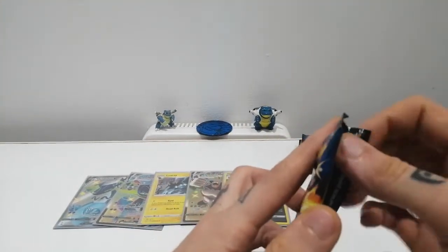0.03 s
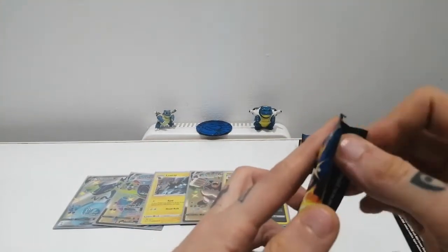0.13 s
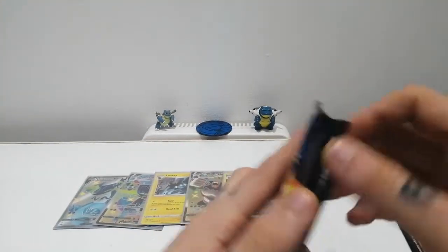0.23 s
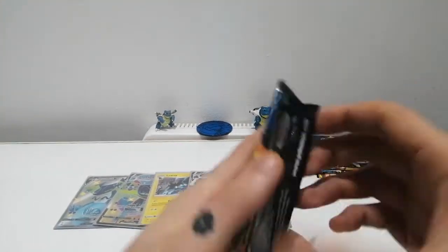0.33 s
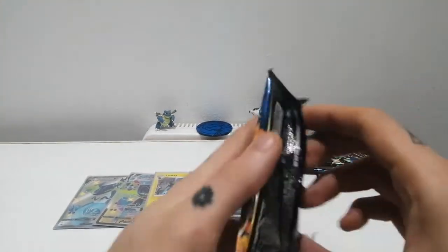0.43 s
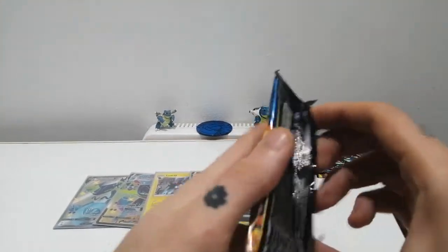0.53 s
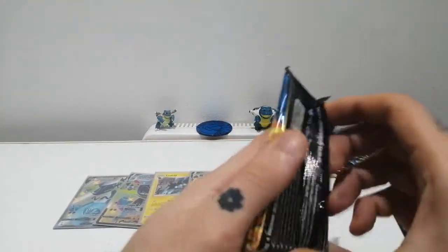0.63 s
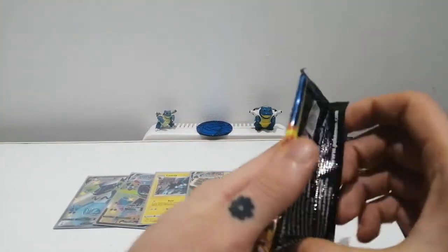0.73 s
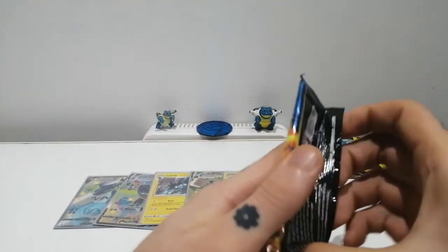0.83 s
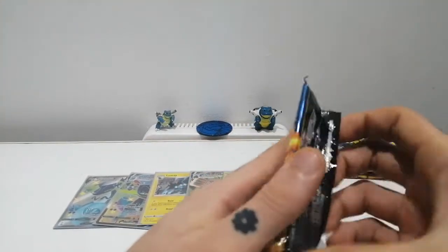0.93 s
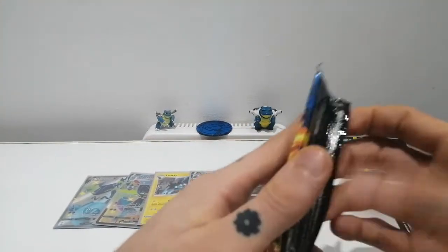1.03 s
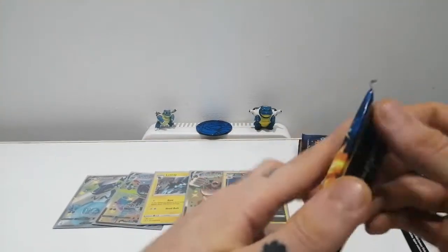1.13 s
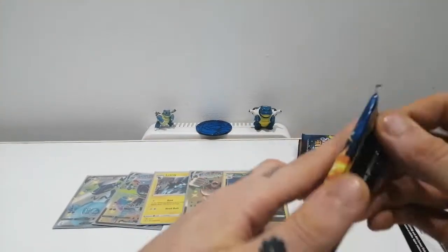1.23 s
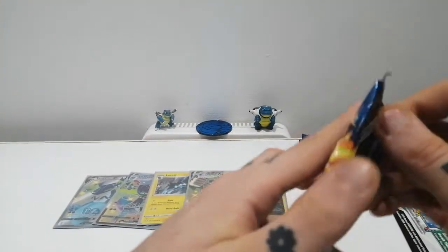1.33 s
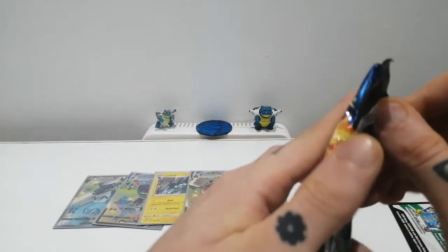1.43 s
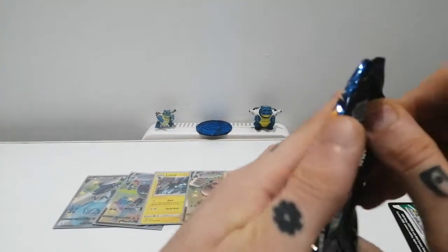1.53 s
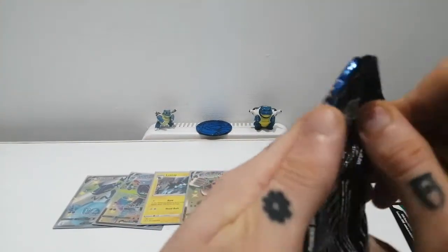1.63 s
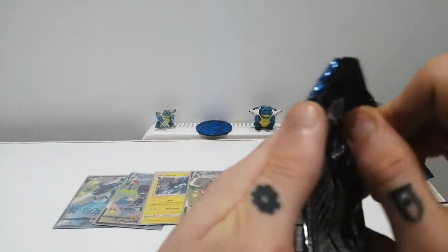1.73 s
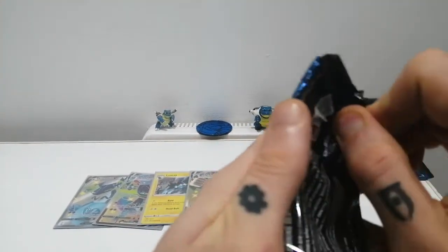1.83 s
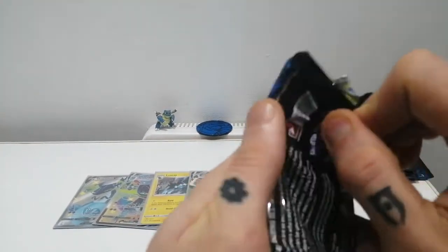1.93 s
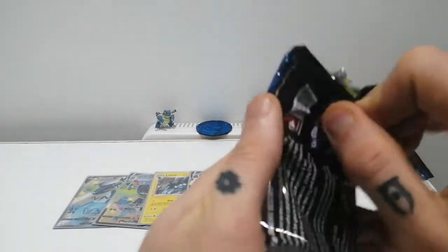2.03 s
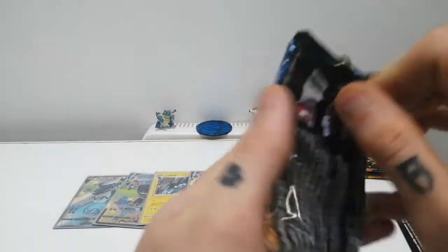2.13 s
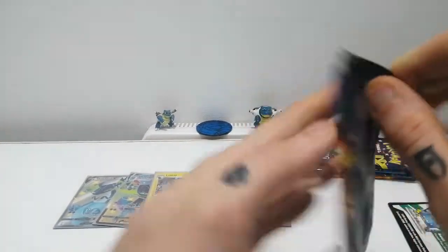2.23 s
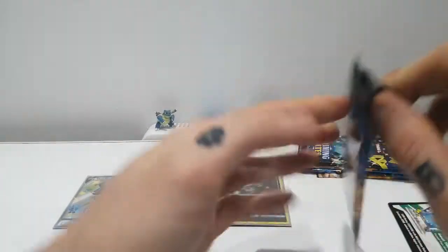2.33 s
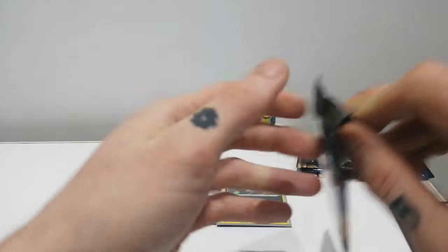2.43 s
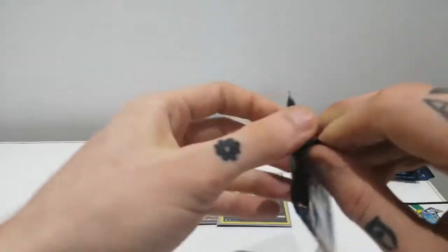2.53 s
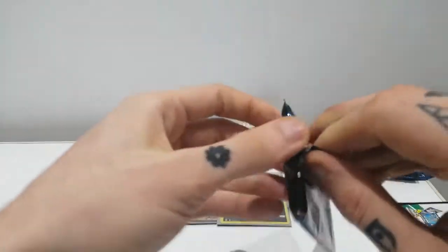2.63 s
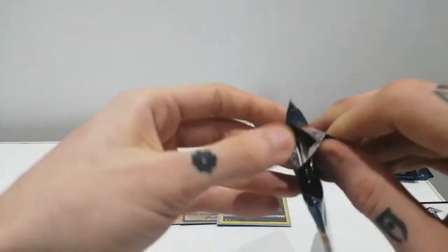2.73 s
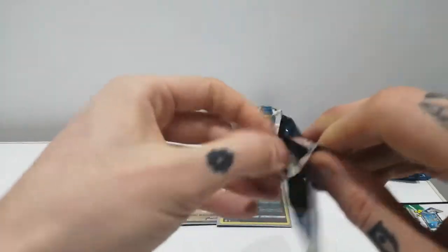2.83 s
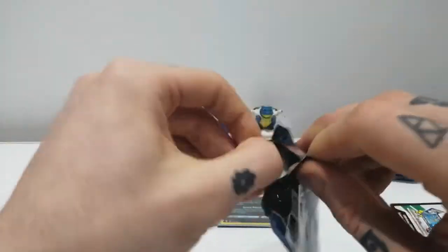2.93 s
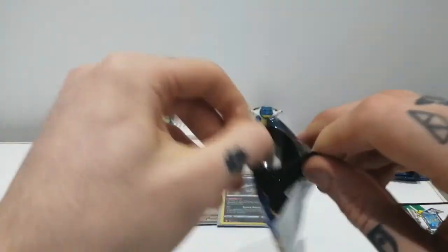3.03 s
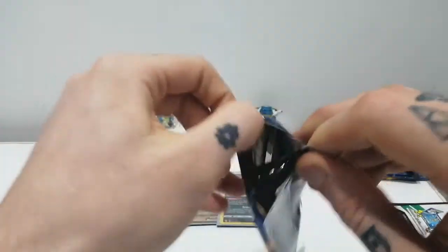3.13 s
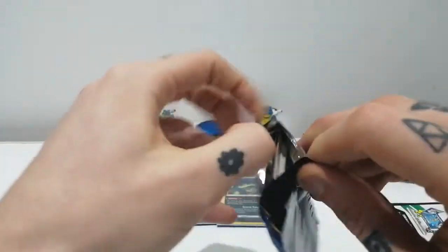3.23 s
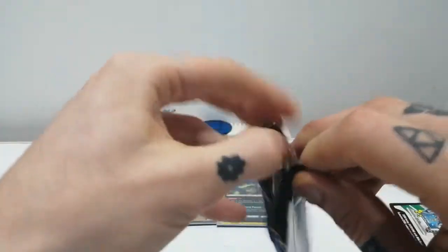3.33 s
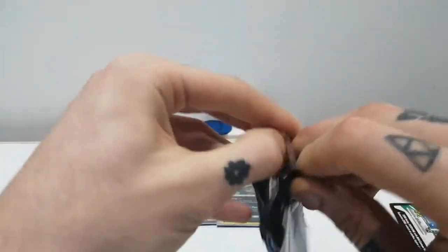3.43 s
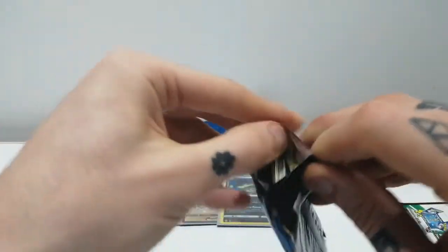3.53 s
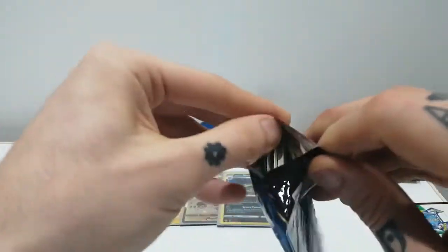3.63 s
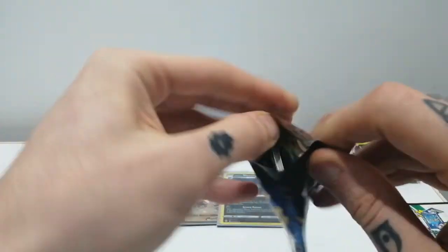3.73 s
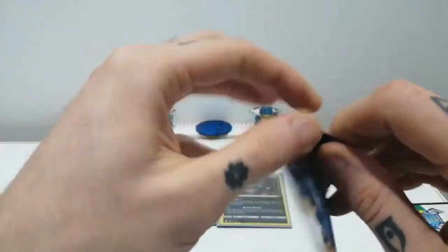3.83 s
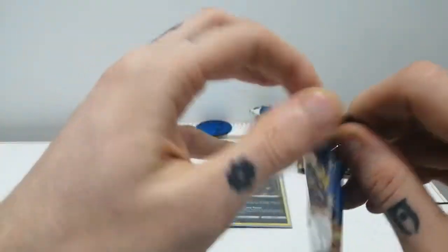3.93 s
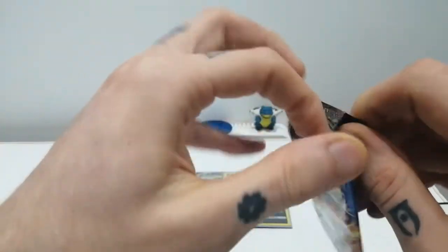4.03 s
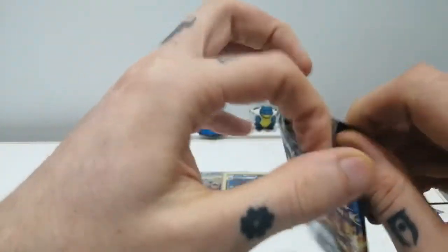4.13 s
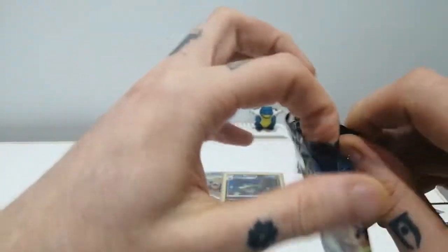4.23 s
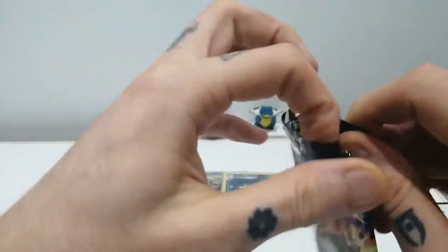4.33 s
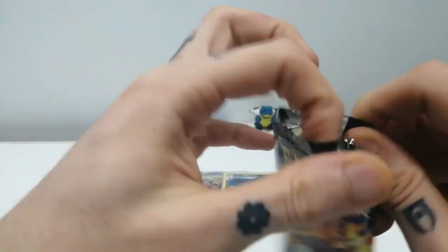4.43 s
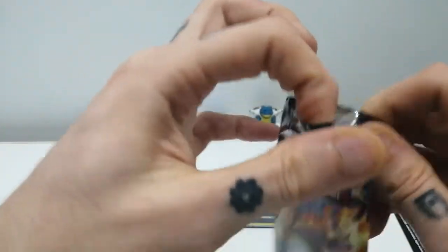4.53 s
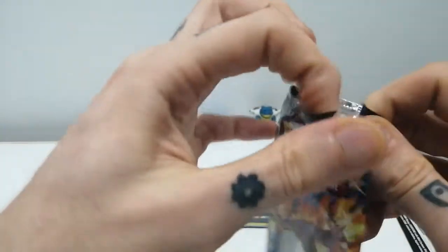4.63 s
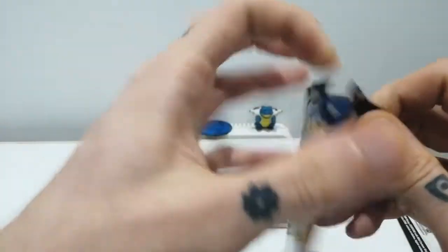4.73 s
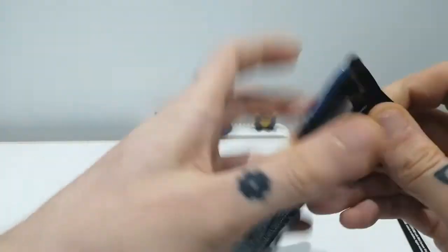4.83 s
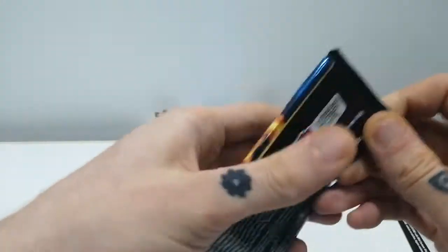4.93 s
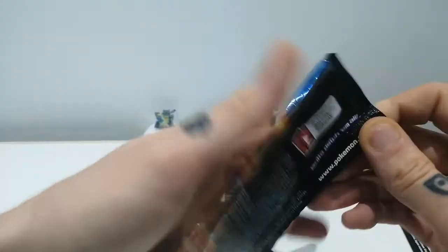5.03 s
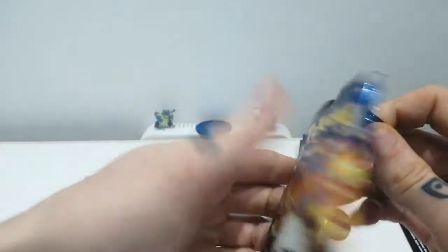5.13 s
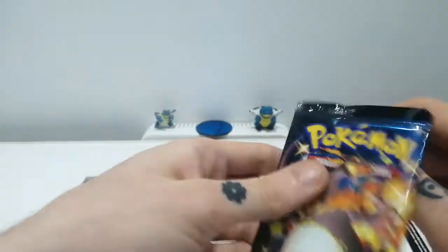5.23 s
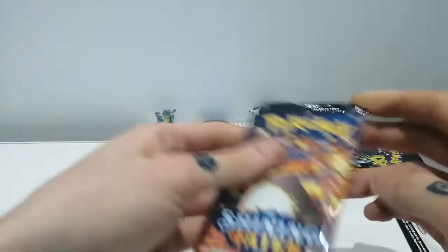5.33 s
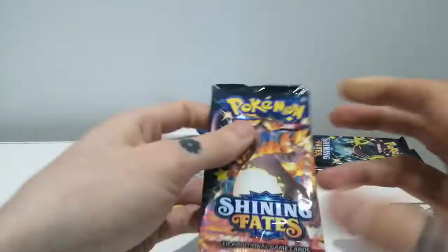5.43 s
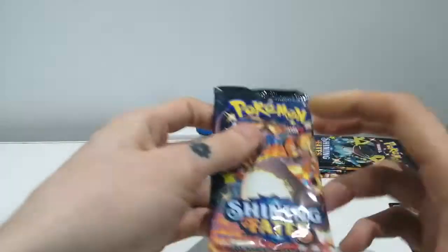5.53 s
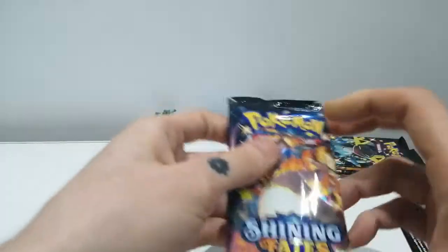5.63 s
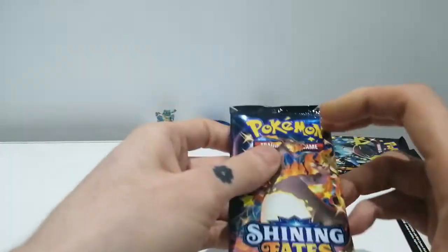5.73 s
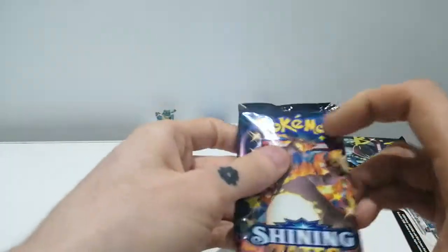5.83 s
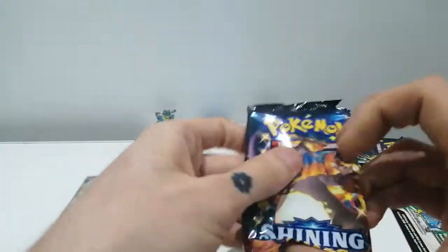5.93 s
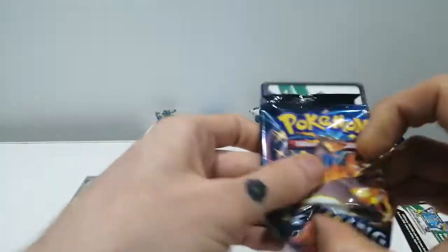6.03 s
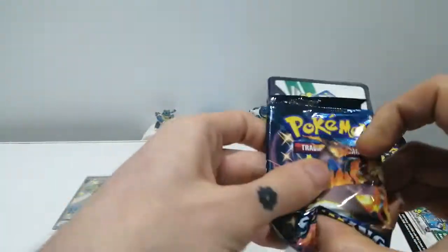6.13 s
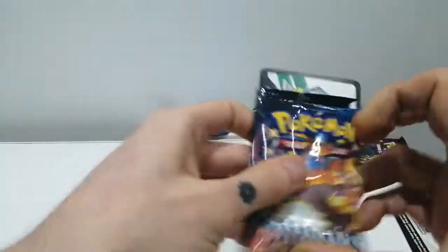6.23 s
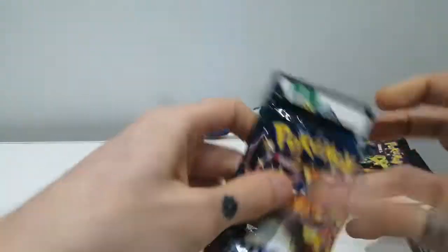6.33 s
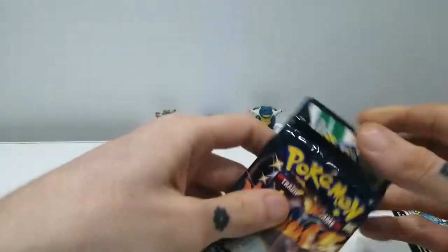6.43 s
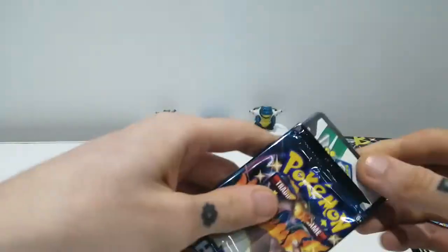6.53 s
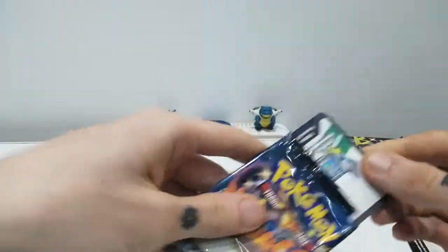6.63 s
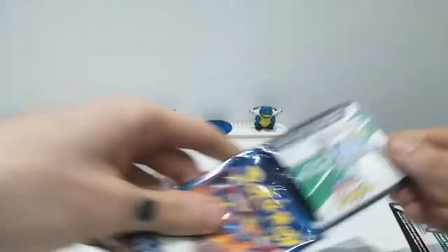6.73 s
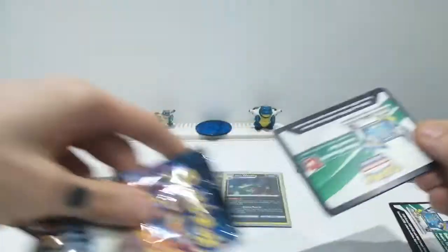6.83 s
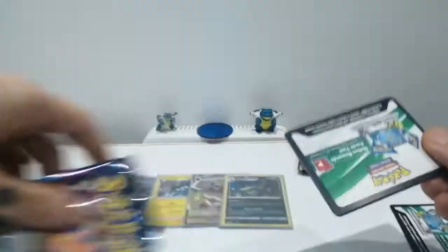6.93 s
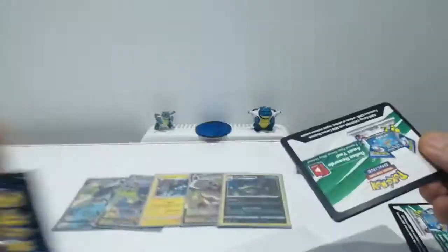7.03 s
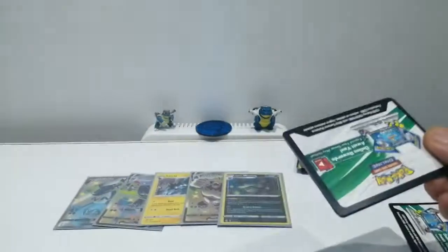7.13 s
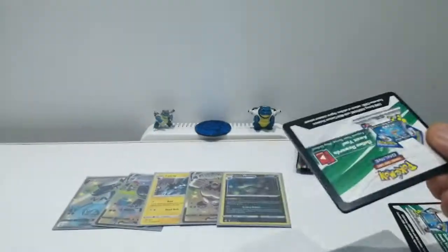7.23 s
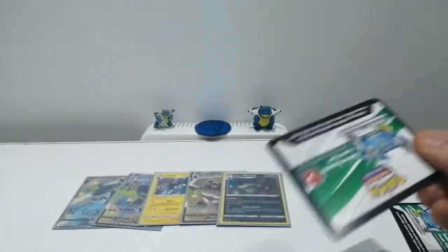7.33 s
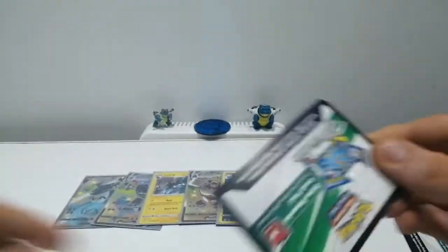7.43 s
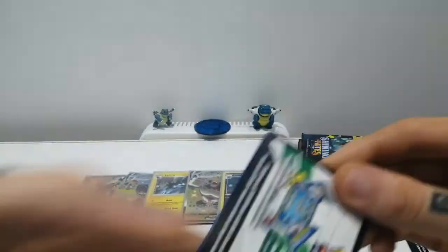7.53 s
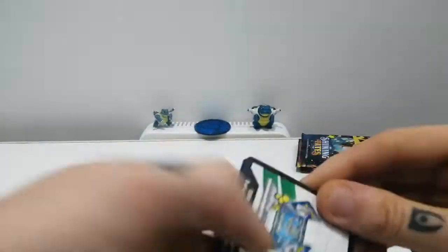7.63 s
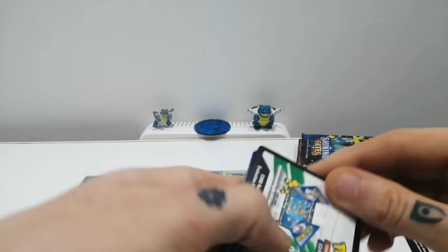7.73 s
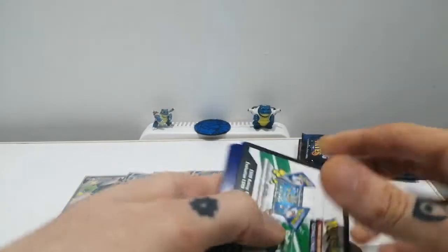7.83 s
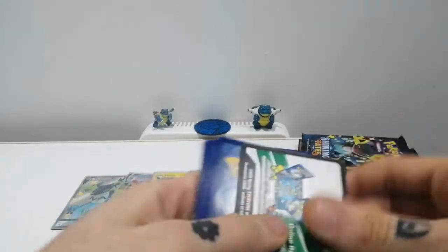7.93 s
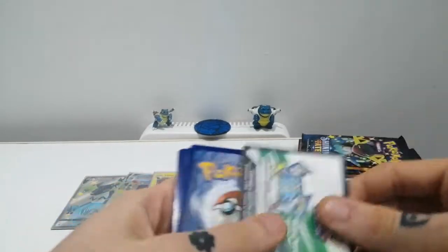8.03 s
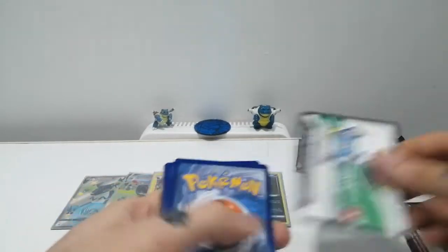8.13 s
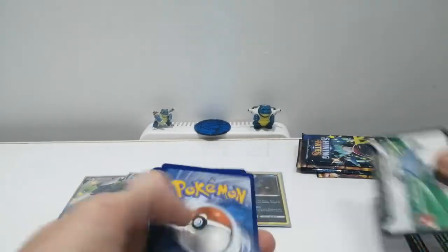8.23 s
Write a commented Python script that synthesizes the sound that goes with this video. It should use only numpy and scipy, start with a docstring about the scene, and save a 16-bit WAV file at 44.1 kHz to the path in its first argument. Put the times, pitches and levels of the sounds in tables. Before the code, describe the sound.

Hands crinkle and tear a crisp foil card pack close to the microphone, then slide cards out with soft hissing rubs and light table bumps.

```python
"""A table in a small room, a two-port microphone close by: hands crinkle a foil card pack and tear it open.
Creases snap and ring their facets over a crackle of tiny flicks; faces of the pouch pop as damped low tones.
Cards slide as a hiss that catches and slips, blows ring the table's modes, and walls return the foil's sound.
A low sine hum wavers underneath, over the faint coloured noise of the room."""
import sys
import numpy as np
from scipy import signal
from scipy.fft import rfft, irfft
from scipy.io import wavfile
from scipy.ndimage import uniform_filter1d

SR = 44100
rng = np.random.default_rng(int(sys.argv[2]) if len(sys.argv) > 2 else 0)


def transcribe(u):
    """Save the signal u as a 16-bit wav file named by the first command-line argument.

    u: samples, shape (n,) or (channels, n), limited to [-1, 1]; the rate is SR.
    q: integer samples, one column per channel.
    """
    v = np.clip(np.atleast_2d(u).T, -1, 1)
    q = np.round(v * 32767).astype(np.int16)
    wavfile.write(sys.argv[1], SR, q)


N = 364707  # samples

# colour of the foil, with the microphone's peak near 15 kHz on top: f/Hz, level per Hz/dB
FOIL_COLOUR = [(60, -42), (150, -25), (330, -17.5), (600, -18.5), (790, -9), (1500, -13), (2100, -8.5),
               (3150, -3), (3800, -9), (5200, 0.5), (7200, 0), (9300, -7.5), (13500, -13), (15000, -8),
               (16000, -30.5)]


def amp(db):
    """Decibels to gain."""
    return 10 ** (np.asarray(db) / 20)


def unit(x):
    """Scales to rms 1."""
    return x / np.sqrt(np.mean(x ** 2) + 1e-20)


def read(points, hz):
    """Reads a spectrum table on a log-frequency axis."""
    f, value = np.transpose(points)
    return np.interp(np.log(hz + 1), np.log(f + 1), value)


def follow(rows):
    """The columns of a curve over time, at every sample."""
    s, *columns = np.transpose(rows)
    return [np.interp(np.arange(N) / SR, s, column) for column in columns]


def bins(size):
    """Frequencies of a real FFT, in Hz."""
    return np.fft.rfftfreq(size, 1 / SR)


def peak(hz, centre_hz, width_hz):
    """The bell of a resonance, 1 at its centre."""
    return 1 / (1 + ((hz - centre_hz) / width_hz) ** 2)


def causal(db):
    """Minimum-phase response with these gains: it rings only after the blow."""
    log_gain = np.log(amp(db))
    circle = np.concatenate([log_gain, log_gain[..., -2:0:-1]], -1)
    return np.exp(np.conj(signal.hilbert(circle)))[..., :log_gain.shape[-1]]


def colour(x, points, size=2048):
    """Filters two channels by a spectrum table."""
    response = irfft(causal(read(points, bins(size))))
    return signal.oaconvolve(x, response[None], axes=1)[:, :N]


def add(mix, s, sound):
    """Mixes a sound in at time s, in seconds."""
    part = mix[:, max(round(s * SR), 0):][:, :sound.shape[-1]]
    part += sound[..., :part.shape[1]]


def worked(rustle, treble, body, split_hz=3000):
    """Plays a rustle with one gain for its treble and one for its body."""
    low = signal.sosfiltfilt(signal.butter(2, split_hz, fs=SR, output="sos"), rustle)
    return treble * (rustle - low) + body * low


def background(hum_hz=101, low_hum_hz=54.4, low_hum_db=-94.5, air_db=-76.5):
    """A wavering low hum and a faint steady one below it, two sines over the noise of the quiet room."""
    # the wavering hum: t/s, rms level/dB
    hum_level = [(0, -76.5), (.24, -84), (.54, -70.5), (.97, -88.5), (1.26, -70.5), (1.55, -88.5),
                 (2.1, -75), (2.36, -94), (2.6, -75.5), (3.15, -84.5), (3.55, -76), (5.3, -83.5),
                 (5.64, -71), (5.97, -87), (6.3, -80.5), (7.45, -78), (7.8, -68), (8.25, -88)]
    # colour of the quiet room: f/Hz, level per Hz/dB
    air_colour = [(20, -16), (35, -8.5), (48, 0), (75, -14.5), (150, -16.5), (300, -18.5), (1000, -26),
                  (3000, -31), (4000, -33.5), (7000, -40), (10000, -38.5), (16000, -37)]
    t = np.arange(N) / SR
    hum = amp(follow(hum_level)[0]) * np.sin(2 * np.pi * hum_hz * t)
    hum += amp(low_hum_db) * np.sin(2 * np.pi * low_hum_hz * t)
    air = unit(colour(rng.standard_normal((2, N)), air_colour))
    return np.sqrt(2) * hum + amp(air_db) * air  # the root of 2 brings a sine to rms 1


def room(x, tail_db=-9, wall_db=-16, wall_s=.0105, wall_spread_s=0.00016):
    """A reflection from the near wall, and a tail of sparse echoes that dies band by band."""
    # decay of the room: f/Hz, t60/s
    decay_times = [(200, 0.88), (1000, 0.47), (3000, 0.61), (6000, 0.63), (10000, 0.33), (16000, 0.93)]
    t = np.arange(SR * 3 // 4) / SR
    taps = rng.standard_normal((2, len(t))) * (rng.random((2, len(t))) < .15)
    wall = taps * np.exp(-((t - wall_s) / wall_spread_s) ** 2)
    hz, at, z = signal.stft(taps * (t > .003), SR, nperseg=256)
    fading = z * amp(-60 * at / read(decay_times, hz)[:, None])
    tail = signal.istft(fading, SR, nperseg=256)[1][:, :len(t)]
    echo = amp(tail_db) * tail / np.linalg.norm(tail, axis=1, keepdims=True)
    echo += amp(wall_db) * wall / np.linalg.norm(wall, axis=1, keepdims=True)
    return signal.fftconvolve(x, echo, axes=1)[:, :N]


def shifting_echo(x, count=5, rounds_per_s=2.3):
    """The echo crossfades steadily round several random sets of reflections, so its colour keeps changing."""
    position = count * rounds_per_s * np.arange(N) / SR
    out = np.zeros((2, N))
    for k in range(count):
        away = abs((position - k) % count - count / 2)
        out += room(x * np.cos(np.pi / 2 * np.minimum(away, 1)))
    return out


def bumps(rattle_db=-15, rattle_s=0.14, rattle_hz=700, chatter_db=5, size=300):
    """Soft blows ring the table's damped modes and briefly rattle what lies on it, as low-passed noise."""
    # blows on the table: t/s, level/dB
    blows = [(6.904, -44), (6.933, -60), (6.974, -53), (7.061, -58.5), (7.1, -65), (7.172, -72),
             (7.301, -67)]
    # modes of the table: f/Hz, level within a blow/dB, t60/s
    modes = [(47.5, -1, 0.55), (59, 1.5, 0.19), (87.4, -5, 0.34), (136, -29, 0.2), (315, -10, 0.11),
             (550, -24, 0.068), (800, -9, 0.082), (897, -6.5, 0.075)]
    t, out = np.arange(SR // 2) / SR, np.zeros((2, N))
    ring = sum(amp(db - 60 * t / t60) * np.sin(2 * np.pi * hz * t) for hz, db, t60 in modes)
    dull = signal.butter(2, rattle_hz, fs=SR)
    for s, db in blows:
        # contact comes and goes
        chatter = amp(chatter_db * unit(uniform_filter1d(rng.standard_normal(len(t)), size)))
        rattle = unit(signal.lfilter(*dull, chatter * rng.standard_normal((2, len(t)))))
        add(out, s, amp(db) * (amp(rattle_db) * rattle * np.exp(-t / rattle_s) - ring))
    return out


def sliding(catch_db=3.0, size=130):
    """Card rubbing on foil or card: a hiss that catches and slips every few milliseconds."""
    # colour of a sliding card: f/Hz, level per Hz/dB
    card_colour = [(60, -18), (250, -13.5), (580, -16.5), (1000, -13.5), (2000, -19.5), (3100, -10.5),
                   (4000, -18.5), (5200, -3.5), (7250, -2.5), (9400, -11.5), (13000, -14.5), (15000, -12),
                   (16000, -23)]
    catch = amp(catch_db * unit(uniform_filter1d(rng.standard_normal(N), size)))
    return unit(colour(catch * rng.standard_normal((2, N)), card_colour))


def strokes(rows, rise_s, fall_s):
    """Power of the treble and of the body over time: each stroke of the fingers builds, holds and lets go."""
    t, power = np.arange(SR // 2) / SR, np.zeros((2, N))
    for start, length, db, body in rows:
        build = np.sin(np.pi / 2 * np.minimum(t / rise_s, 1)) ** 2
        push = build * np.exp(-np.maximum(t - length, 0) / fall_s)
        add(power, start, (amp([[db], [db + body]]) * push) ** 2)
    return power


def effort(grip_body_db=2):
    """How hard the foil is worked, as gains of treble and body: squeezes on top of the steady grip."""
    # squeezes and pulls, each a burst of crackle:
    # start t/s, length/s, treble gain/dB, body of the whole pack relative to the treble/dB
    squeezes = [(0, .06, -49, -29), (.275, .025, -45, -7), (.44, .13, -60.5, 4.5), (.616, .11, -52, -0.5),
                (.733, .04, -43.5, -1), (.94, .06, -55, 11), (1.003, .04, -47, 0), (1.05, .14, -57, -1.5),
                (1.668, .02, -50, 4.5), (1.765, .035, -49, 1), (1.795, .042, -39, -22),
                (1.936, .05, -42, -5), (2.165, .035, -57, 7), (2.205, .06, -51, 3), (2.275, .05, -60, 8),
                (2.335, .08, -54.5, -5), (2.69, .1, -51.5, -6), (2.958, .04, -50, 3),
                (3.035, .065, -42, 3.5), (3.11, .2, -54, 1), (3.43, .07, -57.5, 4), (3.6, .07, -54, 6),
                (3.795, .05, -53, -5), (3.89, .05, -56.5, 2), (4.05, .04, -62, 10.5), (4.1, .025, -50.5, 3),
                (4.19, .05, -51.5, -2), (4.275, .06, -62, 12), (4.46, .07, -49, 5), (4.555, .06, -55, -6),
                (4.69, .06, -55, 10), (4.895, .05, -52, 2), (5.01, .05, -53, 6.5), (5.2, .15, -62, 6.5),
                (5.668, .025, -70, 12), (5.864, .11, -54, -2.5), (6.02, .05, -52, -0.5),
                (6.06, .04, -48, 2.5), (6.105, .025, -45, -20), (6.245, .03, -56, 14),
                (6.275, .04, -46.5, 6), (6.53, .012, -53, -15)]
    # the pack merely held: t/s, treble gain/dB
    held = [(0, -57), (1.1, -60), (1.25, -66), (1.7, -60), (2.1, -64), (2.55, -64), (2.8, -59), (3.7, -63),
            (4.1, -60), (4.4, -66), (5.37, -67), (5.45, -83), (5.85, -84), (5.9, -61), (6.42, -62),
            (6.6, -74), (7.0, -88), (7.5, -100)]
    grip = amp(follow(held)[0] + np.array([[0], [grip_body_db]]))
    return np.sqrt(strokes(squeezes, rise_s=0.0073, fall_s=.014) + grip ** 2)


def body_share(hz, full_hz=1900, none_hz=4600):
    """The pack as a whole radiates the low range, single facets the high."""
    return read([(full_hz, 1), (none_hz, 0)], hz)


def flicks(count, decay_s, scatter, build_up_s=0.0003107, likeness=0.58, lag_s=.00005, size=1024):
    """Spectra of clicks at both ports: a sharp impulse amid bending waves scattered by the creases."""
    t = np.arange(size) / SR
    paths = rng.standard_normal((count, 3, size))
    waves = paths[:, :2] + likeness * paths[:, 2:]  # the third path is common to both ports
    waves *= np.exp(-t / decay_s) * (1 - np.exp(-t / build_up_s))
    waves *= scatter / np.linalg.norm(waves, axis=-1, keepdims=True)
    # the sound reaches the left port first
    lag = lag_s * (.5 + rng.random((count, 1, 1))) * np.array([[0], [1]])
    delay = -2j * np.pi * bins(size)
    return (rfft(waves) + np.exp(delay * build_up_s)) * np.exp(delay * lag)


def crackle(per_s=1100, firm_db=-50, quickening=.7, spread_db=5.5, ring_db=6, ring_width_hz=600,
            count=90, size=1024):
    """Tiny creases and the tearing seam: a train of flicks from many facets, a few of them large."""
    hz, out = bins(size), np.zeros((2, N))
    # sparse ticks when held, a dense rip when pulled
    rate = per_s * (effort()[0] / amp(firm_db)) ** quickening
    sizes = amp(spread_db * np.minimum(rng.exponential(1, N), 4))
    sizes *= rng.random(N) < rate / SR
    # the work done is shared among the creases
    sizes /= np.sqrt(abs(uniform_filter1d(sizes ** 2, size=2000)) + 1e-4)
    facet = rng.integers(0, count, N)
    shape = ring_db * peak(hz, rng.uniform(3200, 9000, (count, 1)), ring_width_hz)
    shape += 3.9 * rng.standard_normal((count, 1)) * body_share(hz)  # dB
    ticks = irfft(flicks(count, decay_s=0.0018, scatter=2.4) * causal(shape)[:, None])
    for at in np.flatnonzero(sizes):
        add(out, at / SR, sizes[at] * ticks[facet[at]])
    return unit(out)


def handling(crackle_db=-1, dull_hz=9000, dull_db=-3):
    """Crackle, its top dulled, follows the work of the fingers; the hiss of card follows each slide."""
    # cards and the empty pouch sliding:
    # start t/s, length/s, treble gain/dB, body relative to the treble/dB
    slides = [(6.65, 0.099, -54.5, 3), (6.78, 0.029, -50, 7.5), (6.89, 0.061, -61.5, 17),
              (7.03, 0.062, -74.5, 23.5), (7.15, 0.26, -78.5, 20), (7.31, 0.092, -75, 21.5),
              (7.46, 0.023, -72, -3), (7.5, 0.024, -73, 2), (7.82, 0.028, -76, -9), (7.9, .04, -76, -10),
              (7.935, 0.069, -66, -4), (8.05, 0.027, -65, 8.5), (8.085, .03, -63.5, 9.5),
              (8.115, 0.032, -55, -2)]
    fine = worked(unit(colour(crackle(), FOIL_COLOUR)), amp(dull_db), 1, dull_hz)
    foil = worked(fine, *effort())
    slide_gains = np.sqrt(strokes(slides, rise_s=0.011, fall_s=0.026))
    cards = worked(sliding(), *slide_gains)
    return amp(crackle_db) * foil + cards


def flexes(level_db=-2.0, decay_s=0.004, rise_s=0.00064, overtone=1.95, overtone_db=-6, side_db=-7):
    """A whole face of the pouch flips over with a dull pop: a few low cycles, damped by the fingers."""
    # flips between the fingers: t/s, level before level_db/dB, pitch f/Hz
    flips = [(0.287, -49, 424), (.958, -46.5, 438), (1.677, -55, 323), (2.243, -55.5, 422),
             (2.385, -55, 423), (3.386, -55, 422), (3.833, -55.5, 431), (4.008, -51.5, 342),
             (4.263, -51, 356), (4.524, -50.5, 430), (4.922, -52, 320), (5.012, -51, 442), (5.14, -56, 320),
             (6.343, -53.5, 438), (6.739, -57, 417), (6.786, -57.5, 276), (7.266, -56, 262)]
    t, out = np.arange(SR // 10) / SR, np.zeros((2, N))
    fade = np.exp(-t / decay_s) * (1 - np.exp(-t / rise_s))
    fade /= fade.max()
    for (s, db, hz), (detune, side) in zip(flips, rng.standard_normal((len(flips), 2))):
        phase = 2 * np.pi * hz * t
        pop = np.sin(phase) + amp(overtone_db) * np.sin(phase * (overtone + 0.21 * detune))
        ports = 1 + amp(side_db) * side * np.array([[1], [-1]])
        add(out, s, amp(db + level_db) * pop * fade * ports)
    return out


def small_snaps(count=80, crowding=.6, above_db=6, ceiling_db=-44, spread_db=2,
                body_spread_db=6, edge_db=2, edge_spread_db=5):
    """Further creases give way at random, oftener and louder the harder the foil is worked; rows for snaps()."""
    hard = effort()[0]
    work = np.cumsum(hard ** crowding)
    when, facet, size, body, edge = np.transpose(rng.random((count, 5)))
    at = np.searchsorted(work / work[-1], (np.arange(count) + when) / count)
    db = np.minimum(20 * np.log10(hard[at]) + above_db, ceiling_db) + spread_db * (2 * size - 1)
    ring_hz = 5400 + 1700 * facet
    body_level = body_spread_db * (2 * body - 1)
    edge_level = edge_db + edge_spread_db * (2 * edge - 1)
    return np.transpose([at / SR, db, ring_hz, body_level, edge_level])


def first_slips(rows, lead_s=.0028, weaker_db=-15, above_grip_db=4):
    """A crease under pressure slips a little just before it snaps through; rows for snaps()."""
    s, db, *tone = np.transpose(rows)
    pressure_db = 20 * np.log10(effort()[0][(s * SR).astype(int)])
    slip_s = s - lead_s * (.5 + rng.random(len(rows)))
    slip_db = np.minimum(db + weaker_db, pressure_db + above_grip_db)
    return np.transpose([slip_s, slip_db, *tone])


def ring_rms(spectra, hz):
    """Rms that short sounds have in the foil's ringing band, 4 to 9 kHz, over 4 ms."""
    band = (hz > 4000) & (hz < 9000)
    power = (abs(spectra) ** 2 * band).mean((-2, -1), keepdims=True)
    return np.sqrt(power / (.004 * SR))


def snaps(rows, body_db=-2.0, edge_db=-1.0, ring_db=6, ring_width_hz=520, panel_db=6, panel_width=0.033,
          pan_spread_db=5, size=1024):
    """Each crease pops through and rings its own facet for a few cycles, with the wider panel around it."""
    s, db, ring_hz, body, edge = np.transpose(rows)[..., None]
    hz, out = bins(size), np.zeros((2, N))
    panel_hz = 600 * 4 ** rng.random((len(rows), 1))
    shape = read(FOIL_COLOUR, hz) + (body + body_db) * body_share(hz)
    shape += (edge + edge_db) * read([(7500, 0), (10000, 1)], hz)
    shape += ring_db * peak(hz, ring_hz, ring_width_hz)
    shape += panel_db * peak(hz, panel_hz, panel_width * panel_hz)
    # a random level difference between the ports for each snap
    pan = pan_spread_db * rng.standard_normal((len(rows), 1))
    ports = amp(pan * np.array([.5, -.5]))[..., None]
    spectra = flicks(len(rows), decay_s=0.002, scatter=1.54) * causal(shape)[:, None] * ports
    pops = irfft(spectra / ring_rms(spectra, hz)) * amp(db)[..., None]
    for at, pop in zip(s[:, 0], pops):
        add(out, at, pop)
    return out


def scene():
    """Foil, cards and table close by, with the foil and cards heard again off the walls."""
    # snaps that stand out from what surrounds them, loud ones and faint isolated ones:
    # t/s, level in the ringing band/dB, ring of the facet f/Hz,
    # body of the whole pack before body_db/dB, sharp edge before edge_db/dB
    clear_snaps = [(.0818, -41.5, 5100, 0.5, 1), (.1015, -44, 6120, 5.5, 5), (.1178, -33.5, 6570, -19, 5),
                   (.125, -38, 7580, -3.5, 6), (.1659, -36.5, 6520, 5.5, 6), (.2093, -30, 6050, -20, 1.5),
                   (.258, -48.5, 6100, 6, 1), (.279, -35, 6260, -6, 5), (.2911, -38.5, 7150, -7, -2),
                   (.362, -42, 5750, 0, 2), (.368, -39, 5300, -5.5, -8), (.4442, -37, 7300, 6.5, 1),
                   (.4835, -41.5, 7100, -2, 1), (.5585, -33, 6440, 2.5, 7), (.5909, -34.5, 7300, -3.5, 6.5),
                   (.6102, -30, 4860, -7.5, -2), (.6145, -34, 7200, -5.5, -2), (.66, -48, 5800, -4, 2),
                   (.678, -41.5, 6160, -0.5, -3), (.735, -35.5, 5300, -14, 6.5),
                   (.7626, -36.5, 6230, -22, 8), (.9059, -35.5, 7340, -12, 3.5),
                   (.9465, -35.5, 6400, -6, -6), (.9599, -44, 5770, 21, 14), (1.0018, -51, 5700, 18, -1),
                   (1.0107, -29.5, 6550, 0, -1.5), (1.0492, -38, 6850, -9, 5), (1.131, -42, 5100, -18, 4),
                   (1.1702, -43, 6100, -22, 9.5), (1.2762, -43.5, 6700, -10, 2),
                   (1.2914, -42, 5800, -21, 4), (1.3124, -42.5, 5500, 2.5, 8),
                   (1.3324, -41.5, 5530, -1, -8), (1.342, -38.5, 7240, -24.5, 10),
                   (1.3833, -34.5, 7100, -3, 6.5), (1.419, -40, 6750, -23.5, -2),
                   (1.4621, -43, 5940, -11, -4), (1.4784, -40.5, 5100, 2.5, 1), (1.5236, -38, 6540, -4, 6),
                   (1.533, -37, 5700, -0.5, -3), (1.5496, -36, 5240, -5.5, -3), (1.5955, -34, 5760, 1.5, 0),
                   (1.6056, -36, 5870, 8.5, 7), (1.6398, -43.5, 6000, 1, 0), (1.6696, -36, 7400, -6.5, -5),
                   (1.675, -34, 6200, -5, 0), (1.7194, -37, 5000, -1, 2.5), (1.751, -43, 5860, 3.5, -6),
                   (1.792, -38, 6550, 6, 11), (1.8167, -34, 5760, -14, 1), (1.8317, -38.5, 6340, 3.5, -9),
                   (1.8593, -43, 6200, -28, 8), (1.9091, -41, 7200, 0, 2), (1.936, -26.5, 5160, -2.5, -1.5),
                   (1.9657, -37.5, 6700, 6, 4.5), (1.98, -38.5, 7100, -2, 5), (2.115, -51, 5960, 9, 4),
                   (2.1571, -37.5, 5600, -4, 6), (2.207, -30.5, 5700, -10, 1), (2.2178, -43, 6100, 7, 4),
                   (2.244, -46, 5900, 1, 5), (2.2896, -44, 5700, -5, 5), (2.2957, -35.5, 7140, -6.5, 4.5),
                   (2.3365, -31.5, 6340, -19.5, -8), (2.386, -39, 6860, -20, 2.5),
                   (2.4051, -46, 7000, -3, 13.5), (2.5702, -35, 7060, -8, -5.5), (2.6511, -40, 7000, -3, 4),
                   (2.6955, -39.5, 5800, -1.5, -10), (2.713, -39.5, 6100, 7, -2),
                   (2.733, -41, 6240, 7.5, 5), (2.7768, -46, 6050, -16, 6), (2.7897, -39, 6050, -5, -2),
                   (2.87, -43.5, 6340, -1, 3.5), (2.9584, -38.5, 5770, 1.5, -1), (2.9672, -43, 6300, 2, 7),
                   (2.9802, -37, 5060, 3, -11), (2.987, -35.5, 4900, -10.5, 2),
                   (3.0313, -38, 5100, -5.5, -2), (3.0526, -37.5, 5640, -6, 5.5),
                   (3.0897, -38, 5800, -9, 8), (3.1212, -42, 6800, -10, 10), (3.1852, -46.5, 7050, 0, -1),
                   (3.2088, -41.5, 7200, 6, 1), (3.2313, -43, 6250, -17, -9),
                   (3.2788, -35.5, 4800, -5.5, -20), (3.3379, -43.5, 6650, -6, -6),
                   (3.4005, -44, 6400, 6.5, 4), (3.4357, -43, 5770, -3, 1), (3.4425, -38.5, 6200, -14, -3),
                   (3.488, -41.5, 6400, -16, -3), (3.6209, -46, 5300, 11, 6), (3.6298, -43.5, 5370, 12, -2),
                   (3.7384, -47, 5600, -2, 4), (3.7946, -42, 5230, 2.5, -11), (3.8009, -39, 5500, 1, 0),
                   (3.8341, -38, 5860, 2, -3), (3.886, -40.5, 5200, 3, 6.5), (3.9253, -49, 5950, 10, 4),
                   (4.01, -39, 6700, 3, 1.5), (4.081, -43, 6140, -9.5, 7), (4.1037, -42.5, 6600, 5, -4),
                   (4.1104, -37.5, 6800, -10, 3), (4.1708, -42.5, 5600, 1.5, 2),
                   (4.221, -45.5, 4800, 9, -24), (4.265, -47.5, 6100, 7, -3), (4.2944, -38.5, 6640, -8, -8),
                   (4.34, -35.5, 6450, -17.5, -4.5), (4.4456, -35, 5700, -3, 1), (4.4689, -40, 6360, 12, 1),
                   (4.4833, -47, 5740, 16, 1), (4.5244, -47.5, 5900, 23.5, -7),
                   (4.5662, -36.5, 6700, -19.5, -2), (4.5759, -42.5, 4160, 7, -2),
                   (4.609, -54.5, 5600, 22, -10), (4.6827, -49.5, 5000, 16, -4),
                   (4.7035, -38.5, 5400, -4, 1), (4.7366, -43.5, 7060, -25, -3),
                   (4.8016, -39.5, 5650, 5.5, -2), (4.8105, -47, 6060, 8.5, -11),
                   (4.84, -45.5, 8400, -16.5, 10.5), (4.8708, -48, 7160, 7, -1), (4.8884, -40, 5600, -3, 2),
                   (4.898, -44.5, 6400, 6, 7), (4.9176, -39, 7600, -4, -6), (4.937, -36, 7300, -6, 2),
                   (5.0121, -39, 5870, 4, -1), (5.0403, -42, 6000, 8, 6.5), (5.0462, -38.5, 7100, 2.5, -3),
                   (5.1427, -34.5, 5200, -9.5, -15), (5.2039, -46, 5500, 0, -5),
                   (5.2314, -46.5, 6600, 4, 0), (5.2581, -41.5, 5940, -14.5, 0),
                   (5.2925, -38, 7400, -8, -1), (5.3784, -44, 6260, 8.5, 6), (5.4957, -47, 5900, -9, -7.5),
                   (5.6691, -56, 6300, 10, 2), (5.6832, -57, 7300, -5, 13.5), (5.8773, -53, 5600, 9, -3),
                   (5.884, -36, 7040, 0, 8), (5.9075, -46.5, 6500, -4, 9), (5.9834, -37.5, 7400, -5.5, 3.5),
                   (6.031, -34, 6450, -12, 2), (6.076, -38, 6950, -18, 7), (6.1023, -42.5, 5700, 0.5, 9),
                   (6.117, -40, 6440, -33.5, 4), (6.251, -52, 6300, 11.5, 12.5),
                   (6.2951, -48.5, 5200, 17, 15), (6.3158, -50, 6700, 0, 1), (6.3423, -41, 6160, -2, -1),
                   (6.375, -38, 6560, 2, 3), (6.4394, -40, 7700, -9, -2), (6.5096, -49, 5950, -23, 0),
                   (6.557, -50, 6760, 6.5, -2), (6.6452, -46, 5900, 3, 0), (6.7929, -52.5, 5630, 11.5, 12),
                   (6.8188, -46, 7600, -7, 5.5), (6.943, -44.5, 6460, 0, 0), (7.1039, -45.5, 5100, 13, -7),
                   (7.226, -59.5, 5500, 9, -11), (7.2687, -60, 3480, 16, -13), (7.3228, -52, 7300, 10, -7),
                   (7.398, -62, 5000, 11, -16), (7.473, -63.5, 3300, 4, -4)]
    creases = np.vstack([clear_snaps, first_slips(clear_snaps), small_snaps()])
    pack = snaps(creases) + handling() + flexes()
    return pack + shifting_echo(pack) + bumps() + background()


def record(dry, low_cut_hz=35, edge_hz=16400, size=511):
    """A low cut; close ports hear the bass alike, and each has its own resonance; then the band limit."""
    # the microphone ports: f/Hz, left over right level/dB
    port_balance = [(100, 1.5), (3500, -0.5), (5200, -2.5), (6300, -3.5), (7300, 8.5), (8700, 6),
                    (10500, 2.5), (13000, -1), (15000, -2)]
    # width of the image: f/Hz, side level/dB
    image_width = [(40, -9), (130, -3), (500, -5.5), (1000, -3), (2000, -0.5), (4000, 0)]
    hz = bins(N)
    low_cut = signal.butter(4, low_cut_hz, "high", fs=SR, output="sos")
    left, right = rfft(signal.sosfilt(low_cut, dry))
    mid = (left + right) / 2
    side = (left - right) / 2 * np.clip(amp(read(image_width, hz)), 0, 1)
    resonances = amp(read(port_balance, hz) * np.array([[.5], [-.5]]))
    ports = np.array([mid + side, mid - side]) * resonances
    low_pass = signal.firwin(size, edge_hz, window=("kaiser", 9), fs=SR)
    return signal.oaconvolve(irfft(ports, N), low_pass[None], "same", axes=1)


dry = scene()
out = record(dry)
transcribe(out)
```